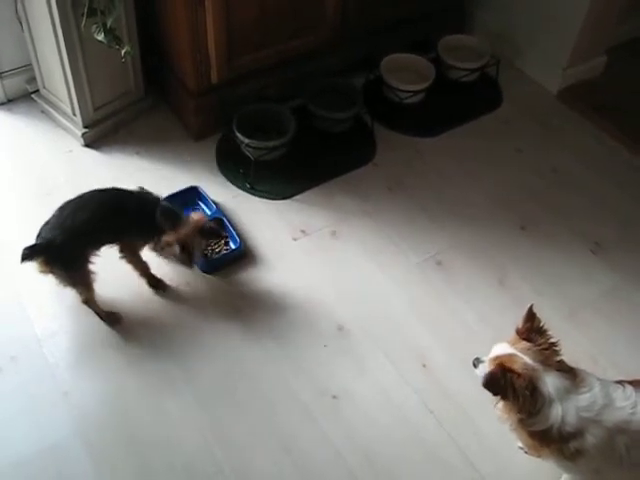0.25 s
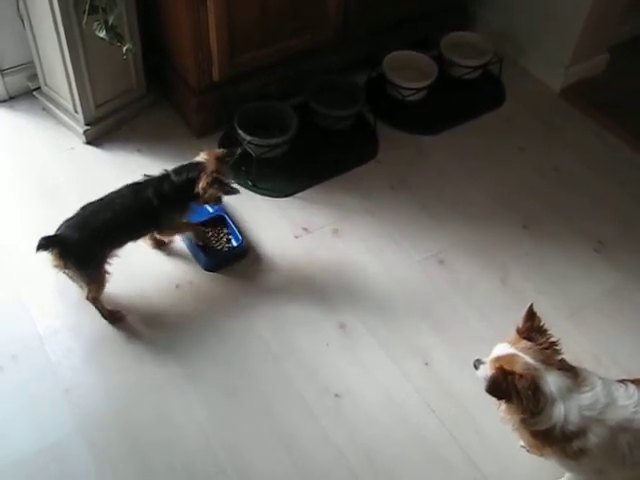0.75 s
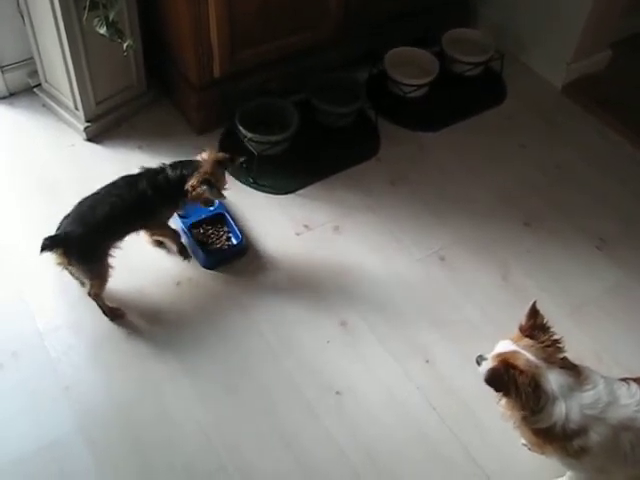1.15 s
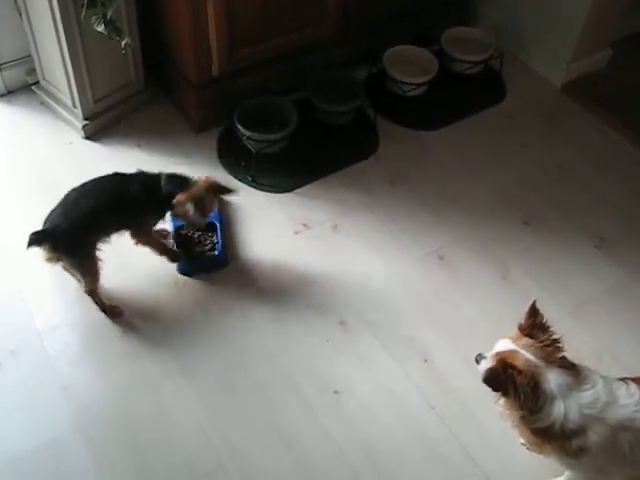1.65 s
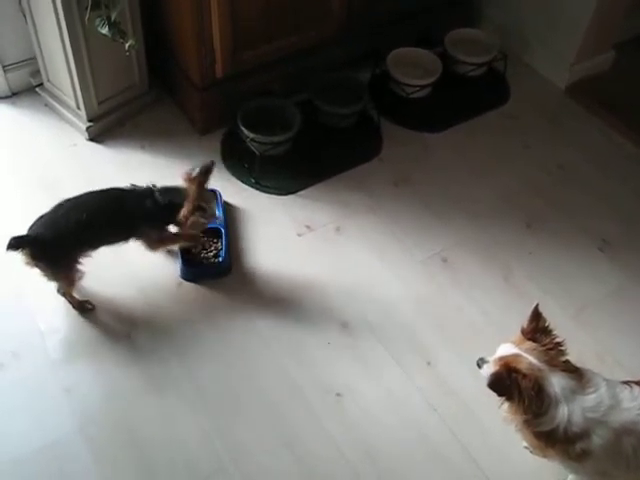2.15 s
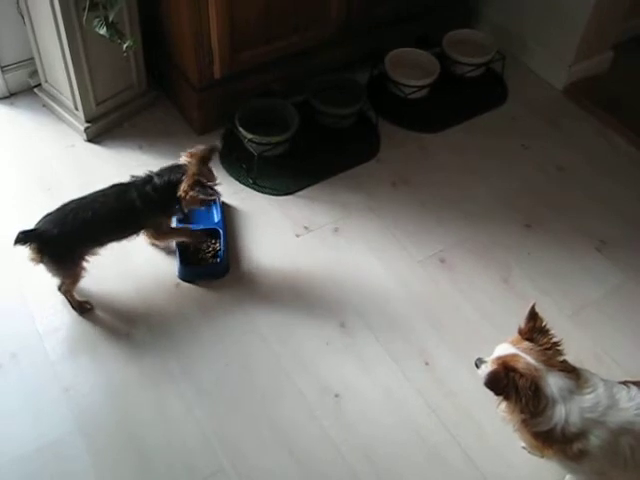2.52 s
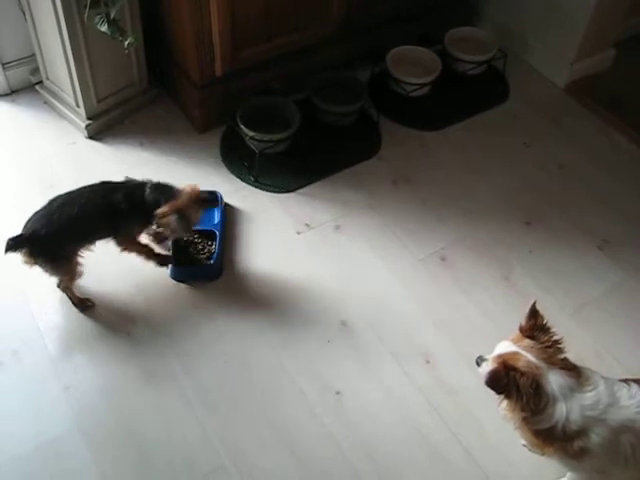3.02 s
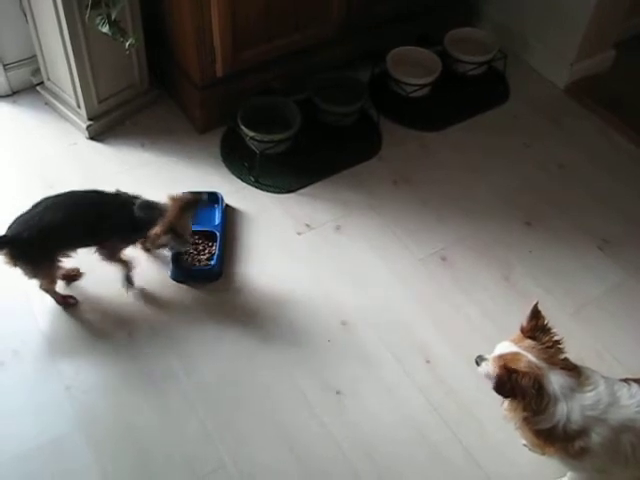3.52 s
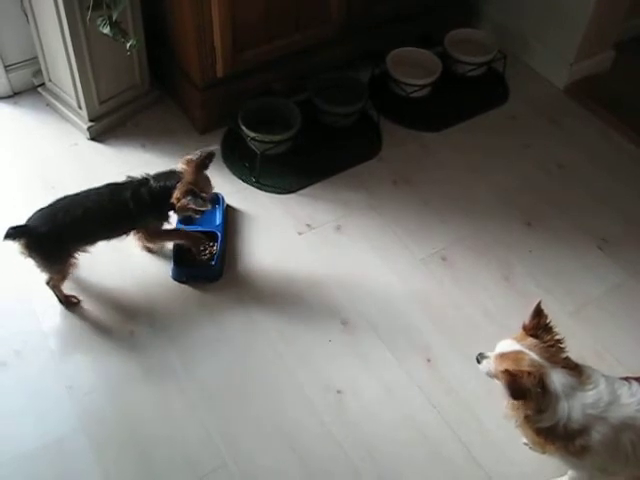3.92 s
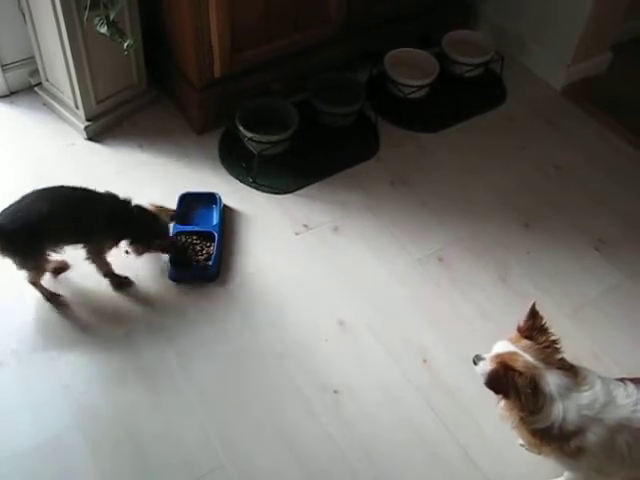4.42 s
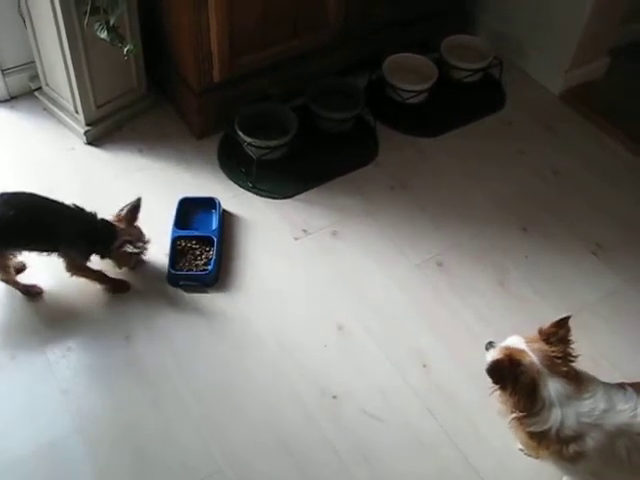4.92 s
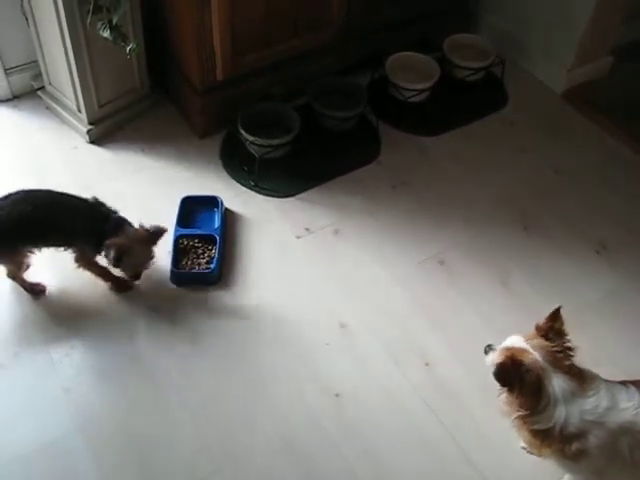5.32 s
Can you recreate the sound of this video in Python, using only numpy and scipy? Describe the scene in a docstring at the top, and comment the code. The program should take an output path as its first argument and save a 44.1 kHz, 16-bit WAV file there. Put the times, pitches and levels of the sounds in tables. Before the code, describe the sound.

In a bare, lively kitchen, a small dog paws at dry kibble in a plastic bowl. Sharp knocks and bursts of bright pellet rattle come in uneven strokes, longer ones shoving the bowl with a hollow scrape. Small dry cracks fall between and after them. Finally paws shuffle softly and the dog whimpers faintly. The mono pickup carries low rumble, hiss and a thin electrical whine.

```python
"""A small dog paws at a plastic bowl of dry kibble on a kitchen floor and crunches pieces in between.
Strokes are random pellet collisions and struck resonances; long ones shove the bowl in stick-slip.
Cracks are brief bright impulses; late on, the dog shuffles back (soft noise) and whimpers (wavering sines).
Decaying noise bands give the bare room; rumble, hiss and a thin electrical whine run throughout, in mono."""
import sys
import numpy as np
from scipy import signal
from scipy.fft import rfft, irfft
from scipy.io import wavfile
from scipy.ndimage import uniform_filter1d

SR = 44100
rng = np.random.default_rng(int(sys.argv[2]) if len(sys.argv) > 2 else 0)


def unload_wav(signal):
    """Save mono or channel-first audio to the path in sys.argv[1] as 16-bit WAV at rate SR, clipped to [-1, 1]."""
    wavfile.write(
        sys.argv[1],
        SR,
        np.round(np.clip(np.atleast_2d(signal).T, -1, 1) * 32767).astype(np.int16),
    )


N = 245637   # length in samples


def from_db(db):
    """Logarithmic level: decibels to amplitude gain."""
    return 10 ** (np.asarray(db) / 20)


def rms_one(x):
    """Power normalization: scale to rms 1."""
    return x / np.sqrt(np.mean(x ** 2) + 1e-20)


def at_hz(points, hz):
    """Logarithmic interpolation: read a table on a log-frequency axis."""
    known_hz, value = np.transpose(points)
    return np.interp(np.log(np.maximum(hz, 1)), np.log(known_hz), value)


def response(spectrum, resonances=(), size=8192):
    """Minimum phase: a causal impulse response of unit energy, resonances standing on a broad spectrum."""
    hz = np.arange(size // 2 + 1) * SR / size
    peaks = sum(from_db(db) / (1 + (2 * (hz - centre) / width) ** 2) for centre, width, db in resonances)
    magnitude = from_db(at_hz(spectrum, hz)) * (1 + peaks)
    # keeping only the positive half of the cepstrum makes the response causal
    cepstrum = irfft(np.log(magnitude))
    cepstrum[size // 2:] = 0
    cepstrum[0] = 0
    impulse = irfft(np.exp(rfft(2 * cepstrum)))
    return impulse / np.linalg.norm(impulse)


def through(x, impulse):
    """Linear filtering: convolve with an impulse response."""
    return signal.fftconvolve(x, impulse)[:N]


def wavering_tone(hz, wander_hz, per_s):
    """Frequency modulation: a sine of rms 1 whose pitch wanders at random."""
    steps = np.arange(N) / SR * per_s
    wander = np.interp(steps, np.arange(N), rng.standard_normal(N))
    phase = 2 * np.pi * np.cumsum(hz + wander_hz * wander) / SR
    return np.sqrt(2) * np.sin(phase)


def grains(per_s, spread_db, even_s):
    """Shot noise: random clicks of uneven size and sign, their power held near 1 over even_s."""
    excess = np.minimum(rng.exponential(1, N), 4)
    sizes = from_db(spread_db * excess) * rng.choice([-1, 1], N)
    clicks = sizes * (rng.random(N) < per_s / SR)
    power = uniform_filter1d(clicks ** 2, max(int(even_s * SR), 8))
    return clicks / np.sqrt(np.maximum(power, 1e-3))


def swell(s, rise_s, fall_s):
    """Gaussian envelope: a smooth rise to 1 at time s and a smooth fall after it."""
    t = np.arange(N) / SR - s
    return np.exp(-.5 * (t / np.where(t < 0, rise_s, fall_s)) ** 2)


def contacts(table, colour, resonances, edge_colour, ring_db, ring_q,
             scatter_db, scatter_t60, edge_db, edge_scatter_db, size=2048):
    """Impact excitation: two rows, each contact's ringing pulse with bright edge, and its scatter."""
    t = np.arange(size) / SR
    first = t < .003   # levels refer to the first 3 ms
    spray = (1 - np.exp(-(t / 0.0011) ** 2)) * from_db(-60 * t / scatter_t60)
    spray *= from_db(scatter_db) / np.linalg.norm(spray)
    scatters = rng.standard_normal((len(table), size)) * spray
    edge = response(edge_colour)
    out = np.zeros((2, N + size))
    for (s, level_db, treble_db, ring_hz), scatter in zip(table, scatters):
        body = response(colour, [*resonances, (ring_hz, ring_hz / ring_q, ring_db)])
        at = int(s * SR)
        parts = [(body, level_db, 0), (edge, level_db + treble_db + edge_db, edge_scatter_db)]
        for impulse, db, scattered_db in parts:
            paths = np.stack([signal.unit_impulse(size), from_db(scattered_db) * scatter])
            hit = signal.fftconvolve(paths, impulse[None, :size], axes=1)[:, :size]
            out[:, at:at + size] += from_db(db) * hit / np.std(hit[0, first])
    return out[:, :N]


# spectrum of rumble and hiss: frequency_hz, relative density_db (per Hz)
HISS_SPECTRUM = [(12, -48), (20, -13.5), (134, -3), (262, -3), (357, -3), (499, -3.5), (542, -5),
                 (849, -6.5), (1290, -8), (2140, -12), (6720, -16), (7730, -18), (8410, -19), (14700, -27),
                 (16000, -35.5)]
HISS_RMS_DB = -48
# electrical whine: frequency_hz, rms level_db, wander_hz
WHINE_TONES = [(7575, -63, 4.33), (15149, -68, 12)]


def background():
    """Stationary noise: shaped rumble and hiss, with slightly wandering whine tones."""
    hz = np.arange(N // 2 + 1) * SR / N
    shaped = rfft(rng.standard_normal(N)) * from_db(at_hz(HISS_SPECTRUM, hz))
    hiss = rms_one(irfft(shaped, N))
    whine = sum(from_db(db) * wavering_tone(centre, wander, per_s=65) for centre, db, wander in WHINE_TONES)
    return from_db(HISS_RMS_DB) * hiss + whine


# paw strokes stir the pellets, hardest at first, then easing:
# start_s, length_s, initial level_db, easing_db_per_s, initial treble_db (re level), initial ring_hz
PAW_STROKES = [(0, 0.004, -28.5, 210, -13.5, 2550), (.688, 0.11, -23, 68, -14.5, 2450),
               (.927, 0.075, -24.5, 53, -8.5, 2000), (1.379, 0.36, -19.5, 57.5, -18, 2950),
               (2.747, 0.58, -22.5, 73, -15, 2350), (3.785, .1, -27, 25, -15, 2240)]
STROKE_ATTACK_S, SETTLE_DB_PER_S = 0.003, 336   # the paw digs in; pellets come to rest once it lifts
SAG_OCTAVES_PER_S = 0.77   # slower pellets ring lower
BRIGHTEN_DB_PER_S = 27   # the fine crackle outlasts the heavier tumbling


def stirring():
    """Dissipation: each stroke's tumbling, crackle and ringing pitch as the motion eases."""
    tumble, crackle, pitch_hz = np.zeros((3, N))
    for s, length_s, level_db, easing, treble_db, ring_hz in PAW_STROKES:
        at = max(int(s * SR), 0)
        t = np.arange(N - at) / SR
        pushed = np.minimum(t, length_s)   # time under the paw
        decay_db = easing * pushed + SETTLE_DB_PER_S * (t - pushed)
        strength = np.minimum(t / STROKE_ATTACK_S, 1) * from_db(level_db - decay_db)
        tumble[at:] += strength
        crackle[at:] += strength * from_db(treble_db + BRIGHTEN_DB_PER_S * pushed)
        pitch_hz[at:] = ring_hz * 2 ** (-SAG_OCTAVES_PER_S * pushed)
    return tumble, crackle, pitch_hz


# resonances of the bowl: frequency_hz, width_hz, peak_db (added to the broad response, relative to it)
BOWL_MODES = [(492, 5, 10.5), (643, 60, 2.5), (1260, 150, 1.5), (1446, 38, 2), (1587, 26, 7.5),
              (2354, 80, -14), (2559, 53, -5), (2950, 78, 3), (3590, 67, -7)]
# spectrum of pellet collisions: frequency_hz, relative density_db (per Hz)
PELLET_SPECTRUM = [(100, -47), (300, -28), (600, -13.5), (1000, -11.5), (1300, -5.5), (1850, -4.5),
                   (2300, 1), (2900, -3), (3800, -1.5), (5200, -8), (7500, -8), (11000, -33), (16000, -50)]
# spectrum of hard corners on plastic: frequency_hz, relative density_db (per Hz)
PLASTIC_EDGE_SPECTRUM = [(100, -57), (3000, -41), (5000, -0.5), (6500, 5), (8500, 0), (11000, -4),
                         (13500, -9), (16000, -20)]


def pellets(count=7):
    """Random collisions: tumbling pellets ring near the pitch of the moment; hard corners crackle."""
    tumble, crackle, pitch_hz = stirring()
    collisions = grains(per_s=560, spread_db=3.0, even_s=0.022)
    pitches = np.geomspace(1700, 4200, count)
    wanted_hz = pitch_hz * np.exp(0.081 * rng.standard_normal(N))
    # each collision goes to the resonator nearest its pitch
    nearest = np.searchsorted(np.sqrt(pitches[1:] * pitches[:-1]), wanted_hz)
    ring_q, ring_db = 4.5, 1.5
    out = through(collisions * crackle, response(PLASTIC_EDGE_SPECTRUM))
    for k, hz in enumerate(pitches):
        ringing = response(PELLET_SPECTRUM, [*BOWL_MODES, (hz, hz / ring_q, ring_db)])
        out += through(collisions * tumble * (nearest == k), ringing)
    return out


# decay time of the kitchen: frequency_hz, t60_s
KITCHEN_DECAY = [(150, 0.6), (500, 0.36), (1300, 0.39), (3500, 0.46), (9000, 0.32), (15000, 0.12)]
# strength of the reflections: frequency_hz, level_db (re the sound sent into the room)
KITCHEN_LEVEL = [(150, 7), (500, -5.5), (1300, 3), (3500, -7), (7000, 4.5), (11000, -13.5), (15000, -12)]


def kitchen(x, first_echo_s, build_s, count=11):
    """Reverberation: reflections thicken after a short gap, then decay exponentially band by band."""
    t = np.arange(int(.7 * SR)) / SR
    edges = np.geomspace(90, 18000, count)
    onset = 1 - np.exp(-np.maximum(t - first_echo_s, 0) / build_s)
    tail = 0
    for low, high in zip(edges, edges[1:]):
        hz = np.sqrt(low * high)
        band_pass = signal.butter(2, [low, high], "band", fs=SR, output="sos")
        band = signal.sosfilt(band_pass, rng.standard_normal(len(t)))
        band *= onset * from_db(-60 * t / at_hz(KITCHEN_DECAY, hz))
        # energy in proportion to bandwidth
        gain = np.sqrt(2 * (high - low) / SR) * from_db(at_hz(KITCHEN_LEVEL, hz))
        tail = tail + band / np.linalg.norm(band) * gain
    return through(x, tail)


# knocks of paw and pellets on the bowl, loud and faint, before the common gains:
# start_s, level_db (first 3 ms), treble_db (re level), ring_hz of the struck spot
BOWL_STRIKES = [(0.1378, -30.5, -11, 3450), (0.6928, -22, -29, 2930), (0.7005, -14.5, -26, 2850),
                (0.7085, -10.5, -7, 3430), (0.7162, -14.5, -23, 2410), (0.7918, -23, -23, 3360),
                (0.9392, -11.5, -4, 2970), (1.0367, -29, -6, 2450), (1.3869, -17, -3.5, 3250),
                (1.4025, -9.5, -25, 2780), (1.4191, -23, -17, 2900), (1.4375, -14, -10, 2840),
                (1.4664, -14.5, -18, 2790), (1.5086, -18, -11, 2600), (1.5399, -17.5, -10, 1740),
                (1.6278, -17.5, -27, 3050), (1.6556, -18, -21, 2260), (1.7488, -30, -5, 3180),
                (2.2744, -26, -28, 2200), (2.2774, -22, -16, 3450), (2.3448, -18, -25, 2270),
                (2.3841, -16, -14, 2280), (2.4822, -28.5, -28, 3080), (2.7505, -14, -9.5, 3130),
                (2.7546, -17, -19, 2950), (2.771, -11, -19, 2000), (2.7923, -13, -4, 2100),
                (2.8666, -20.5, -9, 2880), (2.903, -19, -4.5, 3480), (2.9074, -20, -8, 2620),
                (2.9307, -18, -9, 4720), (2.9822, -24, -28, 2760), (3.0196, -16.5, -10, 3140),
                (3.7878, -22, -4, 3580), (3.7991, -10.5, -10, 2580), (3.8102, -13.5, -28, 2410),
                (3.8241, -34, -18, 2400)]
# spectrum of a knock: frequency_hz, relative density_db (per Hz)
KNOCK_SPECTRUM = [(100, -47), (300, -31), (600, -11.5), (1000, -17.5), (1300, -6), (1850, -4.5),
                  (2300, 0.5), (2900, -1), (3800, 0), (5200, -8), (7000, -16), (10000, -30), (16000, -61)]


def bowl_knocks():
    """Modal excitation: claws and pellets strike the plastic wall, each spot with a brief ring of its own."""
    return from_db(-2.5) * contacts(
        BOWL_STRIKES, KNOCK_SPECTRUM, BOWL_MODES, PLASTIC_EDGE_SPECTRUM, ring_db=4.0, ring_q=3.7,
        scatter_db=0.5, scatter_t60=0.024, edge_db=-4.0, edge_scatter_db=0.0)


# pellets crack between the teeth, before the common gains:
# start_s, level_db (first 3 ms), treble_db (re level), ring_hz
PELLET_CRACKS = [(0.151, -34, 0.5, 3850), (1.8465, -29, 4.5, 5070), (3.0503, -40.5, 14.5, 8500),
                 (3.1268, -26.5, 5.5, 4650), (3.4434, -32.5, 8.5, 5760), (3.5071, -40, 3.5, 4900),
                 (3.9653, -25.5, -2, 2180), (3.9729, -26.5, 1.5, 3250), (4.0892, -26.5, -11.5, 2870),
                 (4.1374, -35.5, -21, 3430), (4.3342, -32.5, 10, 4780), (4.3375, -28.5, 0, 3600),
                 (4.3535, -39, 7, 5000), (4.52, -36, 11.5, 5400), (4.5239, -31.5, -16, 3560),
                 (4.8996, -30, -4.5, 4900), (4.9023, -33, -20, 3700)]
# spectrum of a crack: frequency_hz, relative density_db (per Hz)
CRACK_SPECTRUM = [(100, -17), (500, -20), (1000, -10.5), (2000, -4.5), (3600, 1), (5200, -4), (7000, -7.5),
                  (10000, -29), (16000, -68)]
# spectrum of its bright edge: frequency_hz, relative density_db (per Hz)
CRACK_EDGE_SPECTRUM = [(100, -56), (3000, -43), (5000, -2), (7000, 1.5), (10000, 3), (13000, 3),
                       (16000, -7)]


def crunches():
    """Brittle fracture: dry pellets snap in tiny, bright, very short pulses."""
    return from_db(-1.2) * contacts(
        PELLET_CRACKS, CRACK_SPECTRUM, [], CRACK_EDGE_SPECTRUM, ring_db=3.0, ring_q=15.0,
        scatter_db=0.5, scatter_t60=0.027, edge_db=-2.5, edge_scatter_db=-1.5)


# dull low thumps under three of the hard knocks: start_s, peak level_db
BASS_THUMPS = [(0.7088, -37), (2.792, -44), (3.8, -43)]
# spectrum of a thump: frequency_hz, relative density_db (per Hz)
THUMP_SPECTRUM = [(20, -5), (60, -1), (200, 0), (500, -8), (2000, -40), (8000, -70)]


def thumps():
    """Low-frequency impulse: a short, toneless push of bass."""
    out = np.zeros(N)
    push = response(THUMP_SPECTRUM)
    for s, peak_db in BASS_THUMPS:
        out[int(s * SR)] = from_db(peak_db)
    return through(out, push / np.abs(push).max())


# a few contacts leave a pitched ring: start_s, pitch_hz, level_db (amplitude before build-up and decay), t60_s
PITCHED_RINGS = [(.716, 2340, -29, 0.63), (4.981, 3580, -41, .05), (5.007, 3560, -32, 0.068),
                 (5.038, 3580, -39, 0.087)]


def thin_rings():
    """Damped free vibration: sines that swell over a few milliseconds and die away."""
    out = np.zeros(N)
    for s, hz, level_db, t60 in PITCHED_RINGS:
        t = np.maximum(np.arange(N) / SR - s, 0)
        envelope = (1 - np.exp(-t / 0.0021)) * from_db(level_db - 60 * t / t60)
        out += envelope * np.sin(2 * np.pi * hz * t)
    return out


# the paw shoves the bowl over the floor: full_speed_s, scrape level_db, run_up_s, slowing_s
BOWL_SHOVES = [(1.396, -34, 0.0069, 0.014), (1.59, -27, 0.074, 0.089), (2.972, -33.5, 0.046, 0.05)]
# spectrum of the scrape: frequency_hz, relative density_db (per Hz)
SLIDE_SPECTRUM = [(80, -32), (170, -19), (260, -21), (400, -5.5), (490, -8), (570, -1.5), (740, -1.5),
                  (980, -6.5), (1350, -1), (1900, -14.5), (4000, -12.5), (16000, -41)]
# spectrum of the shell's judder: frequency_hz, relative density_db (per Hz)
JUDDER_SPECTRUM = [(60, -30), (140, -30), (220, -4), (320, -7), (460, 6), (600, -2.5), (1200, -29),
                   (8000, -70)]
JUDDER_DB, JUDDER_POWER = -8.5, 4.0   # level re the scrape at full speed; growth with speed


def sliding_bowl():
    """Stick-slip friction: the rim drives the low modes of the hollow shell, deepest at full speed."""
    slips = grains(per_s=600, spread_db=1.5, even_s=0.058)
    lurches = grains(per_s=300, spread_db=3.5, even_s=0.035)
    scrape, judder = np.zeros((2, N))
    for s, level_db, rise_s, fall_s in BOWL_SHOVES:
        speed = swell(s, rise_s, fall_s)
        scrape += from_db(level_db) * speed
        judder += from_db(level_db + JUDDER_DB) * speed ** JUDDER_POWER
    scraping = through(slips * scrape, response(SLIDE_SPECTRUM, BOWL_MODES))
    juddering = through(lurches * judder, response(JUDDER_SPECTRUM, BOWL_MODES))
    return scraping + juddering


# paws shuffle softly backward, one row a step: peak_s, level_db
SHUFFLE_STEPS = [(4.752, -47.5), (4.79, -45.5), (4.843, -45.5), (5.014, -40), (5.48, -51.5)]
STEP_RISE_S, STEP_FALL_S = 0.0084, 0.01
# spectrum of the brushing: frequency_hz, relative density_db (per Hz)
SHUFFLE_SPECTRUM = [(500, -21), (2500, -6.5), (3600, -2), (5000, -4.5), (6500, -12), (9000, -18),
                    (16000, -30)]


def shuffling_paws():
    """Friction noise: fur and pads brush the floor in a fine, dense grain."""
    pressure = sum(from_db(db) * swell(s, STEP_RISE_S, STEP_FALL_S) for s, db in SHUFFLE_STEPS)
    brushing = grains(per_s=2500, spread_db=3.5, even_s=0.014)
    return through(brushing * pressure, response(SHUFFLE_SPECTRUM))


# faint, thin whimpers, arching in pitch: start_s, length_s, top pitch_hz, level_db (rms at the top)
WHIMPER_CALLS = [(4.813, 0.236, 1183, -52.5), (5.125, .1, 1260, -56), (5.272, 0.16, 1310, -54),
                 (5.439, 0.15, 1316, -52)]
WHIMPER_ARCH_HZ, WHIMPER_WANDER_HZ = 70.1, 75.2


def whimpers():
    """Voice under changing effort: an unsteady, nearly pure tone rises and falls with its loudness."""
    out = np.zeros(N)
    for s, length_s, top_hz, level_db in WHIMPER_CALLS:
        progress = np.clip((np.arange(N) / SR - s) / length_s, 0, 1)
        effort = np.sin(np.pi * progress)
        pitch_hz = top_hz - WHIMPER_ARCH_HZ * (1 - effort)
        out += from_db(level_db) * effort * wavering_tone(pitch_hz, WHIMPER_WANDER_HZ, per_s=430)
    return out


def scene():
    """Superposition: dog, bowl and room add up, the same in both channels."""
    pulses, scatter = bowl_knocks() + crunches()
    rattle = pellets() + sliding_bowl() + shuffling_paws()
    room = kitchen(rattle + from_db(2.0) * pulses, first_echo_s=0.0016, build_s=0.0067)
    mono = pulses + scatter + rattle + thumps() + thin_rings() + room + background() + whimpers()
    return np.stack([mono, mono])


CUTOFF_HZ = 16000


def record(dry):
    """Saturation and band limiting: the tallest peaks are rounded and the top is cut."""
    top = 0.67   # amplitude the rounded peaks approach
    low_pass = signal.ellip(10, .1, 80, CUTOFF_HZ, fs=SR, output="sos")
    return signal.sosfilt(low_pass, top * np.tanh(dry / top))


dry = scene()
out = record(dry)
unload_wav(out)
```